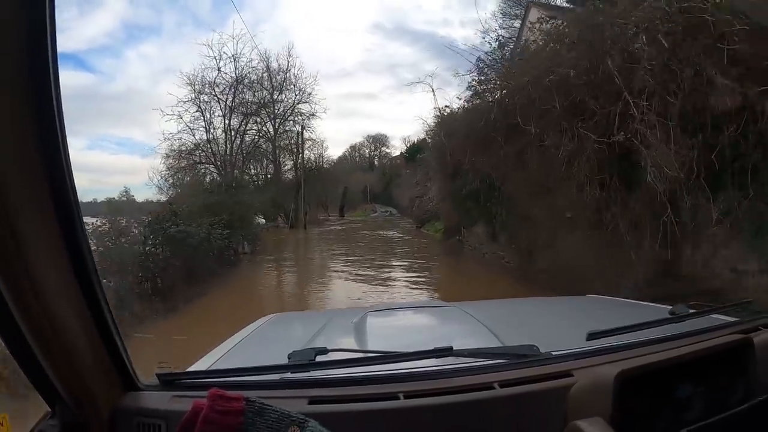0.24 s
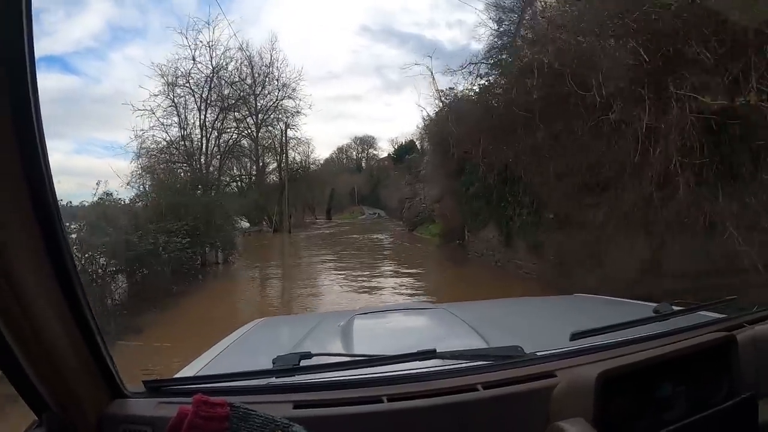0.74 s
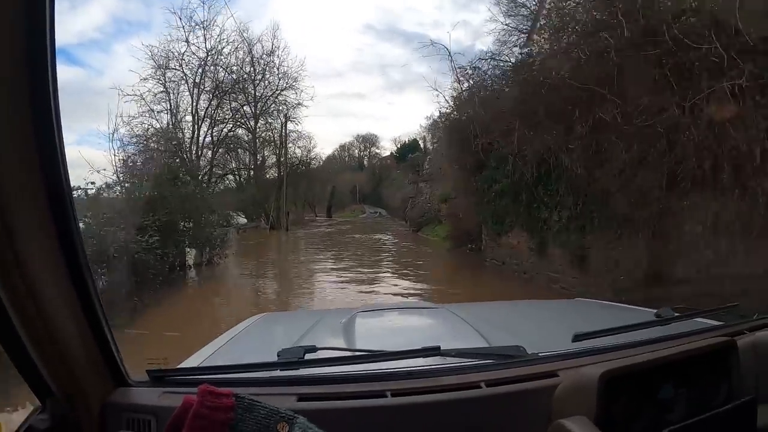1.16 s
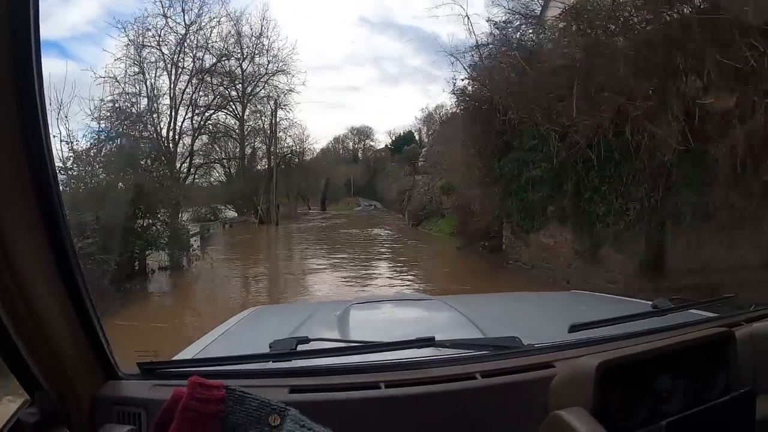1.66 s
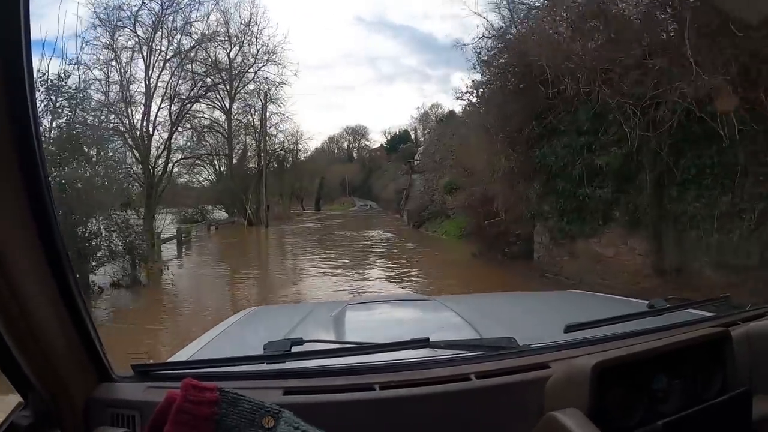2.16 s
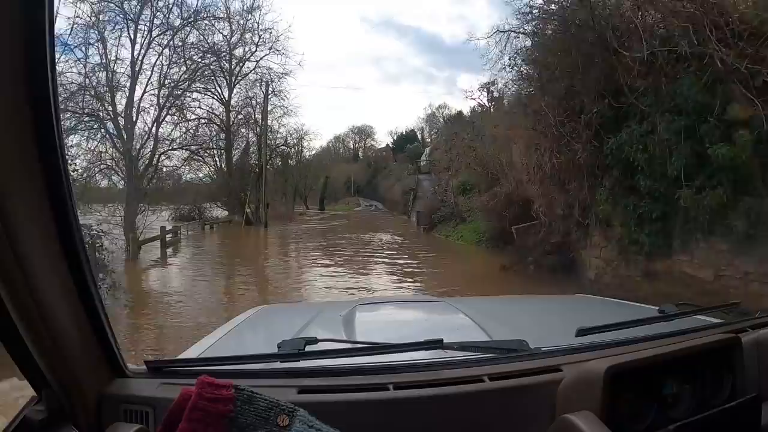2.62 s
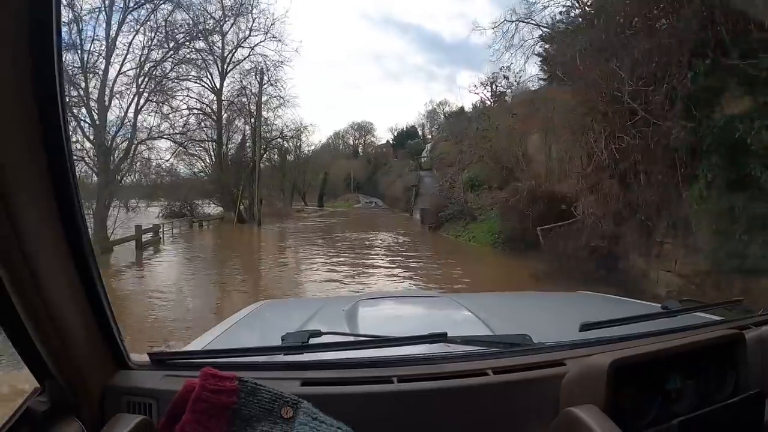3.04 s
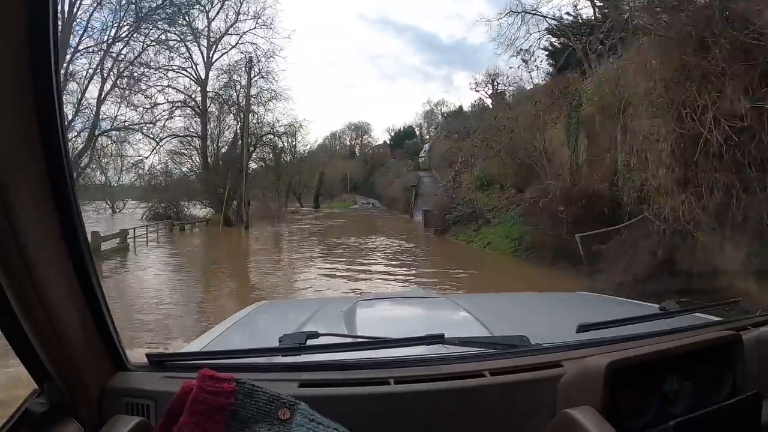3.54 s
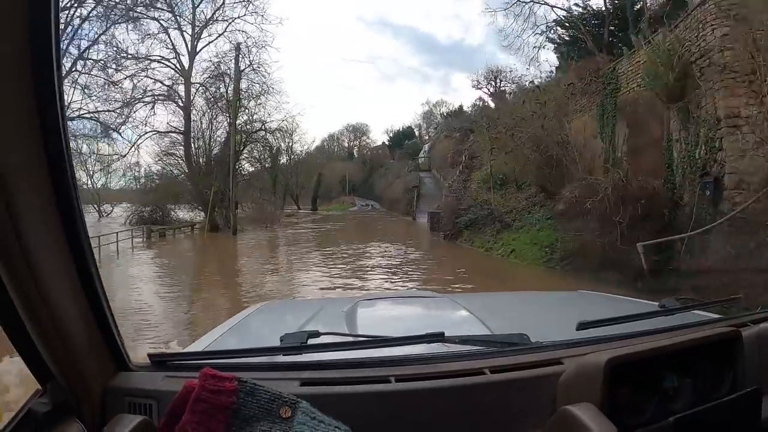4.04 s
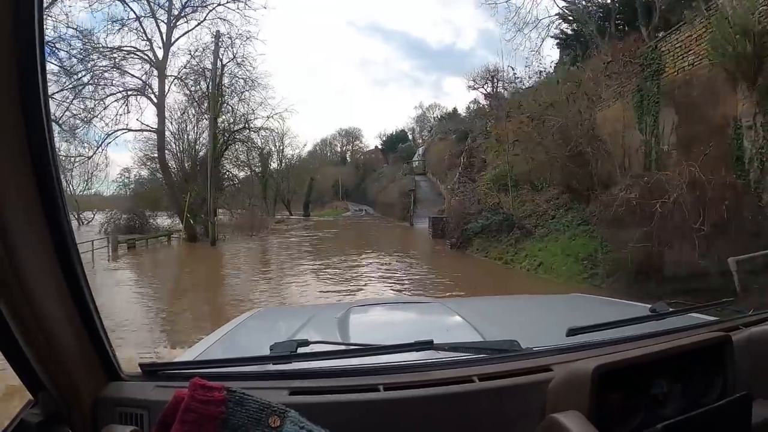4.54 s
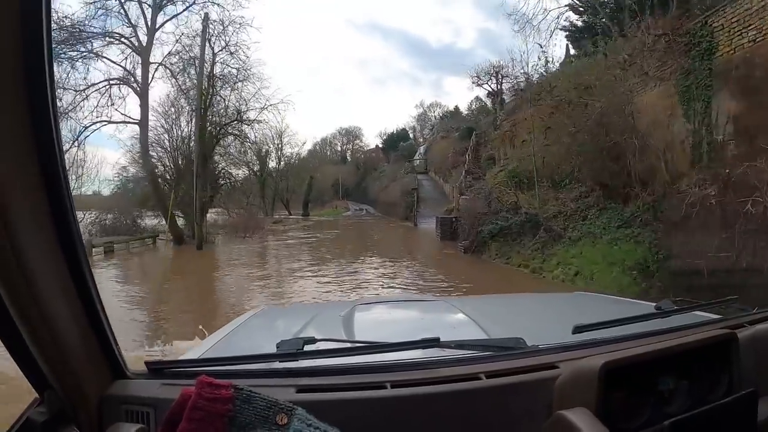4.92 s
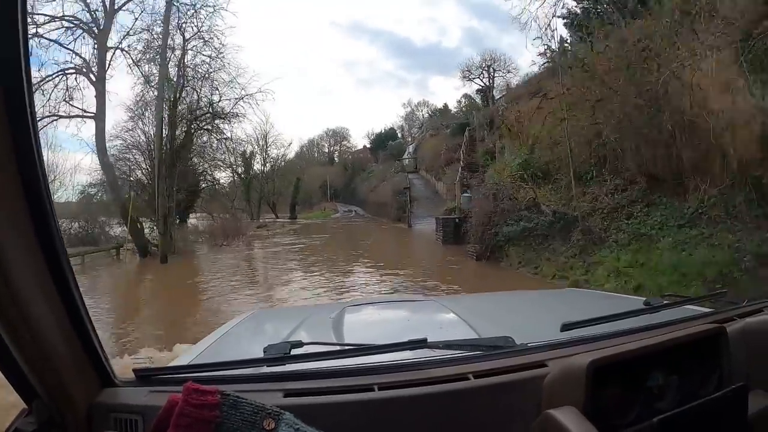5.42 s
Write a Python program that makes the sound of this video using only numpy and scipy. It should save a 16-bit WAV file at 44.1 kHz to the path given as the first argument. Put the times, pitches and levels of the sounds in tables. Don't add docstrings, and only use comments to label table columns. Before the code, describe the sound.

Inside an old four-cylinder vehicle wading a flooded lane, a low engine drone slowly climbs while water rushes and splashes past the side.

```python
import sys
import numpy as np
from scipy import signal
from scipy.fft import rfft, irfft, next_fast_len
from scipy.io import wavfile
from scipy.ndimage import uniform_filter1d, minimum_filter1d

SR = 44100
rng = np.random.default_rng(int(sys.argv[2]) if len(sys.argv) > 2 else 0)


def waveform_to_disk(signal):
    frames = np.transpose(np.atleast_2d(signal))
    scaled = np.clip(frames, -1, 1) * 32767
    samples = np.round(scaled).astype(np.int16)
    wavfile.write(sys.argv[1], SR, samples)


def undo_db(level):
    steps = np.asarray(level, float) / 20
    return 10 ** steps


N = 250488


def unit_rms(x):
    return x / np.sqrt(np.mean(x ** 2) + 1e-20)


def spectrum_at(points, hz, column=1):
    table = np.array(points, float)
    return np.interp(np.log(hz + 1), np.log(table[:, 0] + 1), table[:, column])


def curves(rows):
    s, *columns = np.transpose(rows)
    return [np.interp(np.arange(N) / SR, s, column) for column in columns]


def wander(top_hz):
    t = np.arange(0, N + 64, 64) / SR
    rates_hz = np.geomspace(top_hz / 10, top_hz, 24)
    slow = sum(np.sin(2 * np.pi * (f * t + rng.random())) / np.sqrt(f) for f in rates_hz)
    return np.interp(np.arange(N) / SR, t, unit_rms(slow))


def running_angle(hz):
    return 2 * np.pi * np.cumsum(hz) / SR


def tone(angle, db):
    return np.sqrt(2) * undo_db(db) * np.cos(angle)


def shaped(x, gain):
    size = next_fast_len(N)
    return irfft(rfft(x, size) * gain(np.fft.rfftfreq(size, 1 / SR)), size)[:N]


def sway():
    shudder = shaped(rng.standard_normal(N), lambda hz: np.exp(-((hz - 24) / 7) ** 2))
    return undo_db(-35) * unit_rms(shudder)


def cabin_air():
    noise = shaped(rng.standard_normal(N), lambda hz: 1 / (1 + ((hz - 200) / 130) ** 4))
    return undo_db(-49) * unit_rms(noise) * np.array([[1], [-1]])


def fan():
    t = np.arange(N) / SR
    slip_s, drag_s = 4.0, 4.92
    slip_hz = 9 * np.maximum(t - slip_s, 0) + 45 * np.maximum(t - drag_s, 0)
    hz = 4.28 * curves(ENGINE)[0] - uniform_filter1d(slip_hz, size=9000)
    db = -38.5 + 8 * np.maximum(t - drag_s + .5, 0) + 2.3 * wander(5)
    spin_up = np.minimum(t / 0.34, 1)
    return spin_up * tone(running_angle(hz), db)


# [t/s, peak level/dB, start f/Hz]
GULPS = [
    (1.094, -22, 910),
    (2.641, -31, 627),
    (2.739, -21, 591),
    (2.875, -36, 700),
    (3.423, -25, 813.4),
    (4.621, -38, 905),
]


def gulps():
    out, turn = np.zeros(N), np.linspace(0, 1, num=500)
    for s, db, hz in GULPS:
        glide_hz = hz * (1 + 0.83 * turn)
        note = np.sin(running_angle(glide_hz)) * np.sin(np.pi * turn ** 0.2)
        out[round(s * SR):][:500] += undo_db(db) * note
    return np.array([np.roll(out, shift=3), undo_db(-6.0) * out])


# [t/s, peak level/dB, centre f/Hz, t60/s]
SPLASHES = [
    (.52, -28, 1997, .15),
    (1.09, -30, 997.6, .1),
    (1.46, -29, 947, 0.14),
    (2.2, -30, 1006, 0.13),
    (2.74, -26, 800, 0.21),
    (3.42, -32, 901.6, 0.098),
    (3.6, -39, 2502, .25),
    (3.9, -21, 997.6, 0.099),
    (4.16, -38, 1600, .15),
    (5.35, -17, 1002, 0.085),
]


def splashes():
    out, t = np.zeros(N), np.arange(N) / SR
    for s, db, centre_hz, t60 in SPLASHES:
        def octave_bell(hz):
            return np.exp(-np.log2((hz + 1) / centre_hz) ** 2 / 0.72)

        puff = unit_rms(shaped(rng.standard_normal(N), octave_bell))
        age = np.maximum(t - s, 0)
        attack = 1 - np.exp(-age / 0.01)
        out += undo_db(db - 60 * age / t60) * attack * puff
    return np.array([np.roll(out, shift=3), undo_db(-12.0) * out])


def churn(patchy_db, flicker_db):
    frames = N // 128 + 5
    a, b, patches = rng.standard_normal((2, frames, 257, 3)).T
    patches = uniform_filter1d(patches[..., 0], size=9, axis=0)
    patches = unit_rms(uniform_filter1d(patches, size=24, axis=1))
    flicker = unit_rms(uniform_filter1d(rng.standard_normal(frames), size=18))
    z = (a + 1j * b) * undo_db(patchy_db * patches + flicker_db * flicker)[..., None]
    noise = signal.istft(np.moveaxis(z, 2, 0), nperseg=512, noverlap=384)[1]
    return unit_rms(noise[:, :N])


def drops(per_s, spread_db, cycles):
    out = np.zeros(N)
    for hz in np.geomspace(500, 12000, 24):
        turn = np.linspace(0, 1, int(cycles * SR / hz) + 2)
        rising = np.sin(2 * np.pi * cycles * (turn + 0.13 * turn ** 2))
        bubble = rising * np.sin(np.pi * turn) * np.exp(-2 * turn)
        born = rng.random(N) < per_s / SR / 24
        size = undo_db(spread_db * np.minimum(rng.exponential(1, N), 4)) * born
        out += signal.oaconvolve(size, bubble * hz)[:N]
    return unit_rms(out)


# [t/s, level/dB]
WAVE = [(0, -33), (.2, -35.5), (.3, -33.5), (1.3, -33.5), (1.75, -34), (2.0, -32.5), (2.7, -32.5),
        (2.85, -32.5), (3.55, -32.5), (3.65, -31.5), (4.03, -33.5), (4.2, -33), (4.75, -35), (5.0, -34),
        (5.68, -34)]
# [f/Hz, level/dB per Hz]
WATER_SHAPE = [(190, -22), (330, 0), (570, -6.5), (692, -3.5), (800, -7), (1020, -4), (1120, -6),
               (1520, -6), (2950, -11.5), (6590, -20.5), (7610, -25), (12300, -39.5), (15500, -51)]
# [f/Hz, width/Hz, lift/dB]
CABIN = [(513, 91, 3.5), (700, 140, 2), (924, 46, 3), (990, 130, 2), (7950, 1500, 3.5)]
# [f/Hz, width/Hz, level/dB]
PORT_DIP = (6660, 710, -2.9)
# [f/Hz, likeness/0-1, right leads/rad, left over right/dB]
PORTS = [(100, 1, 0, .2), (250, .98, 0, .5), (420, .86, 0, -.3), (620, .86, .2, 1), (900, .78, .3, 5),
         (1150, .57, .3, 3.5), (1600, .66, .6, 2.5), (2000, .72, .9, 3), (2700, .56, 1.1, 4.5),
         (4200, .08, 2.2, 4.2), (6300, .4, 3.6, 2), (7800, .27, 4.2, 7), (9000, .24, 3.5, -2.5),
         (12000, .15, 3.2, 1)]
# [t/s, lift/dB]
SHEETS = [(.06, 0.5), (.28, 1), (.52, 2), (.7, 1.5), (1.0, 1), (1.44, 1), (2.0, -0.5), (2.29, 2),
          (3.15, 0.5), (3.62, 2), (4.16, 1.5), (4.45, -0.5), (5.25, 1)]


def water():
    rush, diffuse = churn(patchy_db=.8, flicker_db=.25)
    share = .3
    near = np.sqrt(1 - share) * rush + np.sqrt(share) * drops(per_s=5000, spread_db=0.5, cycles=4.5)

    def colour(hz):
        peaks = [*CABIN, PORT_DIP]
        lift_db = sum(db / (1 + (2 * (hz - f) / width) ** 2) for f, width, db in peaks)
        return undo_db(spectrum_at(WATER_SHAPE, hz) + lift_db)

    def lean(hz, side):
        return colour(hz) * undo_db(side * spectrum_at(PORTS, hz, column=3) / 2)

    def same(hz):
        return np.clip(spectrum_at(PORTS, hz), 0, 1)

    def lead(hz):
        return np.exp(1j * spectrum_at(PORTS, hz, column=2))

    left = shaped(near, lambda hz: lean(hz, 0.92))
    right = shaped(near, lambda hz: lean(hz, -1) * same(hz) * lead(hz))
    right += shaped(diffuse, lambda hz: lean(hz, -1) * np.sqrt(1 - same(hz) ** 2))
    pair = unit_rms(np.array([left, right]))
    deep = np.array([shaped(c, lambda hz: 1 / (1 + (hz / 2800) ** 4)) for c in pair])
    wave_db = curves(WAVE)[0]
    t, sheet_s = np.arange(N) / SR, .04
    sheet_db = sum(db * np.exp(-.5 * ((t - s) / sheet_s) ** 2) for s, db in SHEETS)
    spray_db = -28.5 + 0.74 * (wave_db + 33) + sheet_db
    return undo_db(wave_db + 3.0) * deep + undo_db(spray_db) * (pair - deep)


# [t/s, f below firing/Hz, level/dB]
THROB = [(0.0, 7.5, -47), (0.34, 5.96, -25.8), (0.53, 2.3, -27), (0.63, 7.04, -19), (1.21, 10.26, -22),
         (1.45, 6.4, -10.5), (1.55, 3.8, -20.5), (1.7, 5.71, -18.5), (2.39, 11.5, -14), (2.73, 9.4, -16.5),
         (2.85, 14.39, -13), (2.96, 9.5, -15), (3.52, 6.9, -16), (3.69, 13.7, -21), (3.79, 8.69, -20),
         (4.59, 15.3, -25), (4.74, 11.9, -27.1), (5.68, 12.1, -21.5)]
# [t/s, peak level/dB]
RUTS = [(.12, -21), (.47, -22), (.75, -30), (1.5, -20), (1.86, -19), (2.12, -19.5), (2.62, -23),
        (2.98, -20), (3.38, -22.5), (3.75, -18.5), (4.35, -19), (4.65, -41), (5.25, -33), (5.5, -29)]
# [f/Hz, level/dB per Hz]
RUMBLE_SHAPE = [(12, -21), (22, -2), (35, -6), (50, -3.5), (70, 3), (95, 1), (140, -3), (200, -1.5),
                (270, -9.5), (330, -14.5), (450, -25.5), (700, -75), (2000, -120)]


def body():
    below_hz, high_db = curves(THROB)
    t, firing_hz = np.arange(N) / SR, curves(ENGINE)[0]
    loaded = np.clip((t - 3.6) / 0.35, 0, 1)
    start_turns = -0.1
    high_angle = running_angle(firing_hz - below_hz) - 2 * np.pi * start_turns
    high = tone(high_angle, high_db + loaded * 5.5 * wander(9))
    twin_angle = running_angle(firing_hz + 9.5 + 1.2 * wander(3))
    twin = loaded * tone(twin_angle, DRONE[-1][1] - 10.5 + 3.0 * wander(4.3))
    bed_db, rut_s, low_mode_hz = -33, 0.065, 39.94
    shaken = undo_db(bed_db) + sum(undo_db(db) * np.exp(-.5 * ((t - s) / rut_s) ** 2) for s, db in RUTS)
    low = shaken * tone(running_angle(low_mode_hz + 1.31 * wander(4)), 0)
    rumble = unit_rms(shaped(rng.standard_normal(N), lambda hz: undo_db(spectrum_at(RUMBLE_SHAPE, hz))))
    rumble_db = -24 + 0.95 * (curves(WAVE)[0] + 33) + .4 * wander(3)
    return low + high + twin + undo_db(rumble_db) * rumble


# [t/s, firing f/Hz, second-order level/dB]
ENGINE = [(0.0, 55.22, -33), (0.45, 54.53, -39), (0.9, 54.87, -30.5), (1.35, 55.12, -29.5),
          (1.65, 55.44, -27), (2.1, 55.85, -38), (2.55, 56.55, -30), (2.85, 57.36, -23), (3.3, 58.63, -24),
          (3.42, 58.99, -17), (3.6, 59.81, -16), (4.05, 60.45, -19.5), (4.35, 61.84, -25),
          (4.55, 62.42, -18.5), (5.15, 62.31, -16), (5.45, 63, -21.5), (5.6, 63.1, -21),
          (5.68, 63.3, -12.5)]
# [f/Hz, level/dB]
DRONE = [(54.6, -12.5), (55.6, -17.5), (56, -19.5), (56.6, -30), (57.6, -18), (59, -24.5), (60.6, -14),
         (63, -14.5)]
# [f/Hz, level/dB]
SNARL = [(164.8, -33), (166.3, -54), (167.6, -33), (169.4, -42), (171, -30), (177, -23), (182, -27.5),
         (188.5, -21.5)]
# [multiple of firing f, level against the half order/dB]
FAINT_ORDERS = [(1.5, -5), (2.5, -7.5), (4.5, -15.5), (5, -10)]


def engine():
    hz, load_db = curves(ENGINE)
    firing = running_angle(hz)
    third_db = spectrum_at(SNARL, 3 * hz)
    peak_hz, width_hz = 58.34, 2.24
    half_db = -33.5 - 13 * np.minimum(((hz - peak_hz) / width_hz) ** 2, 1)
    smear = np.maximum(.65 + .62 * (hz - 60), -.6)
    out = tone(firing, spectrum_at(DRONE, hz) + .8 * wander(4))
    out += tone(3.5 * firing, half_db + 2.5 * wander(6))
    out += tone(2 * firing + 2 * smear, load_db + 1.1 * wander(10))
    out += tone(3 * firing + 6 * smear, third_db + 1.3 * wander(8))
    out += tone(4 * firing, -37 + 9 * np.clip(hz - 62.3, -.2, .6) + 1.5 * wander(5))
    for multiple, db in FAINT_ORDERS:
        out += tone(multiple * firing, half_db + db + 3.5 * wander(5))
    return out


def scene():
    low = engine() + body() + sway()
    corners_hz = (1, 4.4)
    ports = [signal.lfilter(*signal.butter(1, hz, "high", fs=SR), low) for hz in corners_hz]
    low = np.array(ports) * undo_db([[.09], [-.09]])
    blades = fan() * undo_db([[.6], [-.6]])
    return low + blades + cabin_air() + water() + splashes() + gulps()


def band_limit(x):
    return signal.sosfilt(signal.butter(12, 15610, fs=SR, output="sos"), x)


def record(dry):
    tallest = -minimum_filter1d(-abs(dry).max(0), size=500)
    over_db = np.maximum(20 * np.log10(tallest + 1e-9) + 4.1, 0)
    limiter = undo_db(-.8 * uniform_filter1d(over_db, size=500))
    to_edge = np.minimum(np.arange(N), np.arange(N)[::-1])
    soft_ends = np.minimum(to_edge / 90, 1)
    return band_limit(dry * soft_ends * limiter)


dry = scene()
out = record(dry)
waveform_to_disk(out)
```